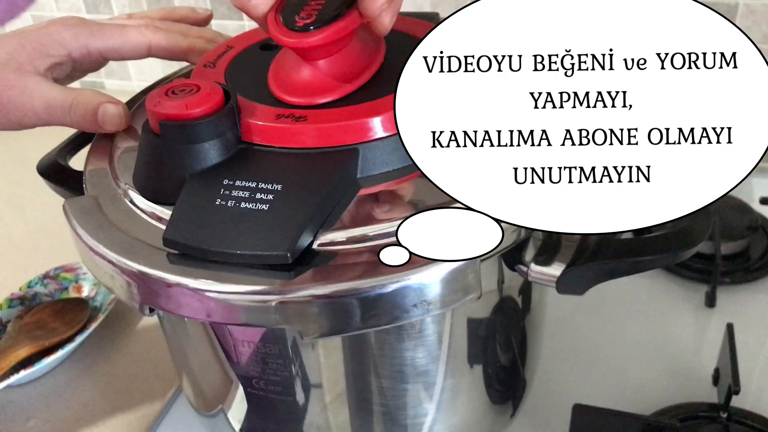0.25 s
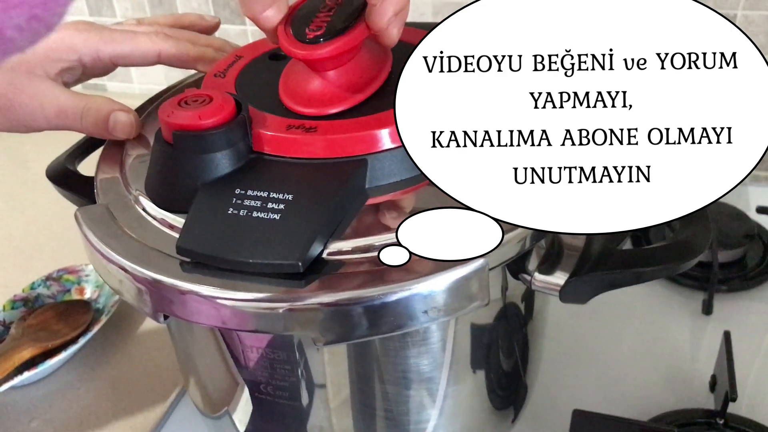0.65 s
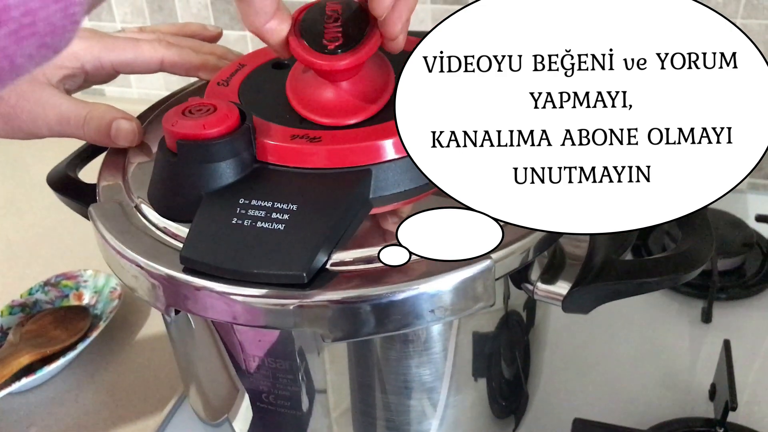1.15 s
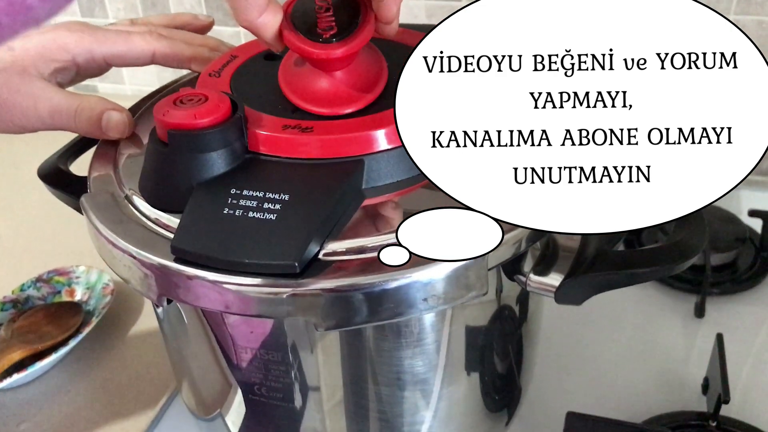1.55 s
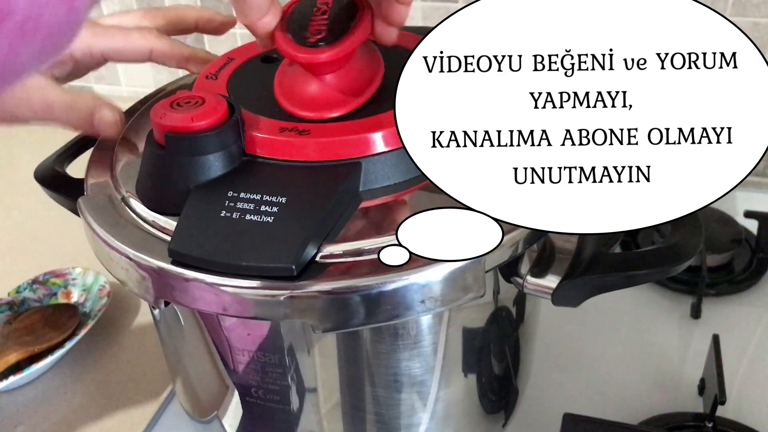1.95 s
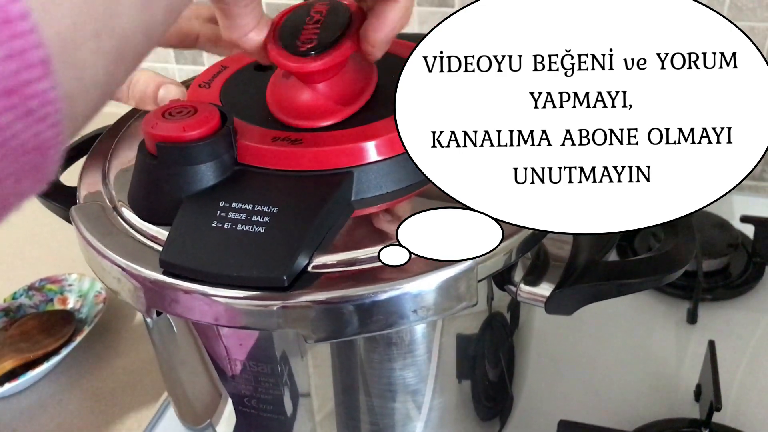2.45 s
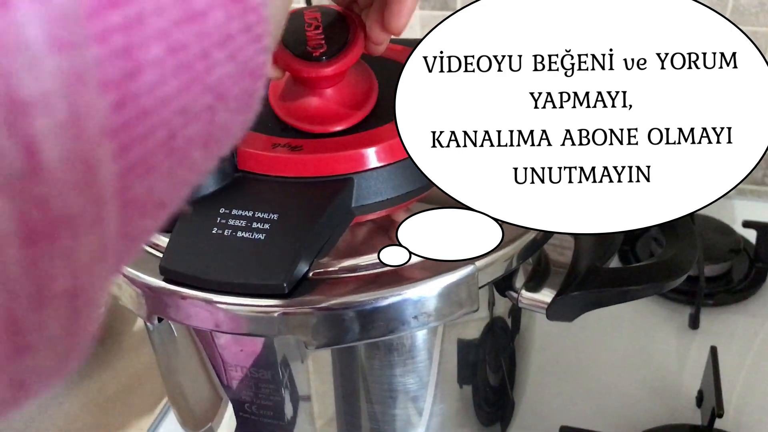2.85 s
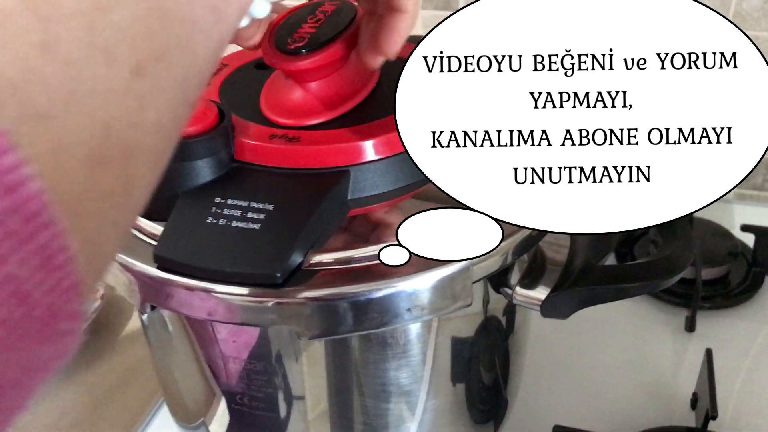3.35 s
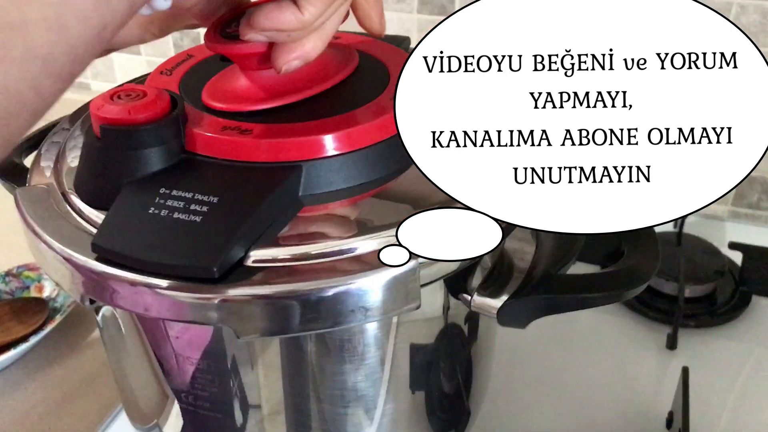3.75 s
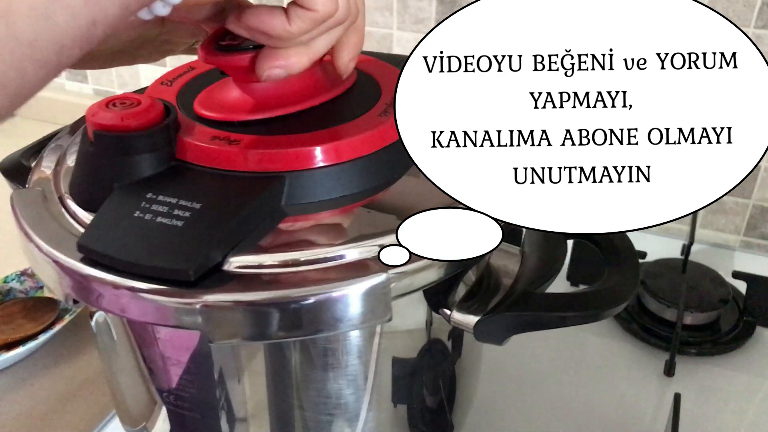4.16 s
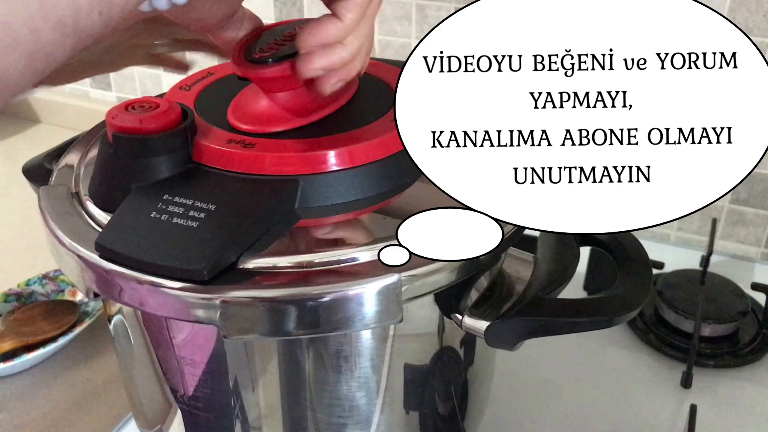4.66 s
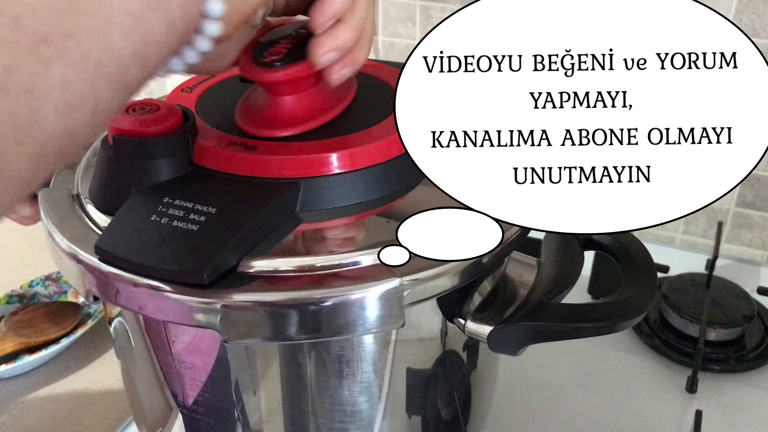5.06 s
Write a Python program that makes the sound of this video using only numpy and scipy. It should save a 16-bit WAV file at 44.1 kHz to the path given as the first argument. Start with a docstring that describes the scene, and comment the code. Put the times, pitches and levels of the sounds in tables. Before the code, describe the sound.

Close, mono sound of a hand working a plastic knob on a steel pressure cooker in a tiled kitchen. Faint steady hiss and low rumble continue throughout. Soft ticks fall between 0.1 and 0.25 s, then a quick loose plastic rattle at 0.34-0.44 s with a low pot nudge. After a pause, a tight burst of clacks at 0.85-0.9 s snaps the catch shut: by far the loudest event, hard and bright, with brief metallic lid ring, hollow pot thump and short room tail. Small clicks follow at 1.16-1.27 s. From about 2 s, quiet ticks and faint finger scuffs appear near 2.07, 2.55 and 3.1 s, with a clearer dull tick at 2.6 s. Light clicks and soft pot bumps come at 3.6-3.9 s, a small click cluster with lid shake at 4.6 s, and a final scuff and dry tick near 5.2 s.

```python
"""A hand turns the plastic knob of a steel pressure cooker in a tiled kitchen, over steady faint hiss and rumble.
First come soft ticks, then a loose rattle, and just before one second the catch snaps shut; small clicks follow.
From two seconds on, fingers scuff the knob between sparse ticks, and the last clicks come close to the end.
Each contact is a noise burst through the knob's resonances plus a snap, a ringing lid and a thump in the pot.
Swelling tones rock the pot, swelling noise shakes the lid and scuffs the knob, and shaped noise is the hiss."""
import sys
import numpy as np
from scipy import signal
from scipy.fft import rfft, irfft, next_fast_len
from scipy.io import wavfile
from scipy.ndimage import uniform_filter1d, map_coordinates

SR = 44100
rng = np.random.default_rng(int(sys.argv[2]) if len(sys.argv) > 2 else 0)


def decibels_to_gain(level_db):
    """Convert a level in decibels to a linear amplitude gain (20 dB per decade)."""
    exponent = np.asarray(level_db, float) / 20
    return 10 ** exponent


def waveform_to_disk(signal):
    """Save audio, clipped to [-1, 1], as 16-bit WAV at the path in sys.argv[1]."""
    frames = np.transpose(np.atleast_2d(signal))
    scaled = np.clip(frames, -1, 1) * 32767
    samples = np.round(scaled).astype(np.int16)
    wavfile.write(sys.argv[1], SR, samples)


N = 233834  # length [samples]

# Contacts of the catch and knob: (time [s], clack peak [dB], clack centre [Hz],
# snap re clack [dB], push on the pot re clack, before the thump gain [dB])
CONTACTS = [(0.076, -51.5, 1310, 3, -13), (.158, -40, 1260, -19, -36), (.25, -48.5, 1350, -7, -10),
            (.338, -29, 1430, -19, 4), (.343, -28.5, 1240, -10, -26), (.364, -43, 2320, 6, -1),
            (.382, -27, 1990, -1, -24), (.387, -35.5, 1600, -6, -23), (0.436, -30, 1930, -1.5, -9),
            (.85, -41, 1960, -8, -10), (.873, -35.5, 1700, 0, -18), (.881, -22, 1760, 3, -21),
            (.884, -12, 1900, -5, -14), (.888, -12, 2300, -3, -16), (.892, -7, 2700, -1, -6),
            (.895, -12, 2400, -1, -20), (.9, -12, 2280, -4, -14), (.905, -14, 2420, -5, -10),
            (1.158, -34, 1290, -4, 4.5), (1.166, -37.5, 1510, -2, -2.5), (1.224, -37, 1740, -1.5, 5),
            (1.23, -39, 1900, -9, -4.5), (1.271, -32, 2000, -21, -18), (1.556, -52.5, 1970, -14, -20),
            (2.053, -42, 2200, -25, -21), (2.057, -43, 2250, -22, -20), (2.071, -47, 2200, -21, -17),
            (2.078, -38, 1980, -6.5, -2), (2.519, -42, 3320, 3.5, -20), (2.558, -44, 2040, -17, 7),
            (2.597, -27.5, 2100, -26, -33), (2.607, -39, 1610, -25, -10), (2.875, -53, 1340, -1, -11),
            (3.122, -51.5, 2300, 7.5, 3.5), (3.521, -56.5, 1400, -11, 14), (3.61, -37, 1540, -7, -10),
            (3.721, -40.5, 2240, -2, 2.5), (3.86, -49.5, 1226, -10, 9), (4.11, -52.5, 900, -11, 2.5),
            (4.56, -38, 980, -3.5, 5.2), (4.5701, -31, 2500, -36, -22), (4.6, -34.5, 1950, 5.5, -16),
            (4.635, -36.5, 1900, 0, -1), (4.639, -41, 1500, -7, 2.5), (5.109, -48.5, 980, -26, 4),
            (5.122, -44.5, 1320, -6, 5.5), (5.185, -48, 2300, 4, -21), (5.191, -22, 2260, -25, -16),
            (5.2, -32.5, 1400, -23, -8.5)]
# Ringing modes of the steel lid: (frequency [Hz], relative level [dB], t60 [s])
LID_MODES = [(1287, -2, .3), (1394, 1, .3), (1561, -5, .25), (1809, -6, .27), (1879, -5, .3),
             (1986, -4, .21), (2213, -9, .3), (2363, -2, .26), (2546, -4, .17), (2735, -8, .24),
             (3042, -14, .3), (3397, -12, .25), (3488, -12, .3), (4102, -8, .21), (5620, -9, .23),
             (5911, -10, .22), (6126, -10, .23), (7106, -11, .27), (7251, -11, .2)]
# Resonances of the pot on the stove: (centre [Hz], width [Hz], relative level [dB])
POT_MODES = [(65, 15, -5), (92, 9, 1), (117, 16, -1), (155, 25, -5), (219, 10, 1), (278, 14, -2),
             (330, 40, -6), (362, 12, 2), (470, 50, -8), (548, 14, -1), (595, 25, -5), (680, 60, -9),
             (950, 120, -12)]
# Treble colour of a contact's snap: (frequency [Hz], relative level [dB])
SNAP_COLOUR = [(2500, -25), (4200, -3.5), (6000, -0.5), (8000, -0.5), (10500, -4.5), (12500, -0.5),
               (15500, -8.5), (17000, -75)]
# Resonances of the plastic knob: (centre [Hz], width [Hz], relative level [dB])
KNOB_MODES = [(1350, 1370, -9.5), (2030, 370, -5.5), (2300, 310, -7), (3460, 1220, -9), (4300, 1400, -10),
              (6481, 3700, -22)]
# Colour of the broad floor, rumble to hiss: (frequency [Hz], relative level [dB])
FLOOR_COLOUR = [(15, -45.5), (30, -18), (45, 12.5), (65, 8.5), (100, 6), (140, -3), (300, -6.5), (800, -11),
                (1400, -11.5), (2100, -20.5), (3500, -22), (5000, -19.5), (8000, -23), (10500, -25),
                (14500, -23.5), (15800, -22), (15900, -89.5)]
# Narrow bands of the hiss: (centre [Hz], width before squaring [Hz], level over the broad floor [dB])
HISS_BANDS = [(988, 100, 4.5), (1400, 126, 10.5), (3425, 755, 11.5), (5142, 190, 17.5), (8920, 200, 13),
              (9700, 120, 14), (11780, 780, 12.5), (12600, 200, 5), (14610, 1300, 13)]
# Tail of the tiled room: (frequency [Hz], t60 [s], relative starting level [dB])
ROOM_TAIL = [(100, 0.806, -2.5), (510, 0.4, 4.5), (2000, 0.42, -7.5), (6040, 0.28, -4), (8950, 0.1, -1),
             (14000, 0.15, 5)]
# Pushes of the hand; the pot rocks on the stove (under 160 Hz) or hums in its wall:
# (peak time [s], nominal level [dB], rise [s], fall [s], mean pitch [Hz])
PUSHES = [(.355, -50, 0.02, .1, 124.8), (.446, -48.5, 0.13, 0.21, 95), (0.904, -28, .025, 0.09, 117.7),
          (.9, -33, 0.026, 0.22, 91.9), (1.0, -44, 0.11, 0.072, 136.6), (1.235, -48, .15, 0.21, 94.4),
          (2.09, -63.5, .15, 0.22, 96), (2.52, -60, 0.057, .2, 117), (2.62, -61.5, .08, .25, 93.4),
          (3.14, -59.5, 0.062, 0.057, 109.9), (3.545, -61, 0.075, 0.14, 92), (3.73, -48.5, 0.18, .17, 115),
          (3.864, -52, .07, 0.11, 150), (3.915, -53.5, .1, 0.17, 92.7), (4.19, -57.5, 0.096, 0.17, 139.7),
          (4.61, -50.5, .1, .1, 116.4), (4.655, -48, .06, 0.077, 132.7), (4.72, -52, 0.17, 0.2, 92),
          (5.128, -55, 0.046, .05, 115), (5.216, -50.5, .05, 0.048, 143.3), (0.891, -36.5, 0.018, .08, 273),
          (2.565, -49, .02, 0.11, 362), (4.572, -51.5, .015, 0.13, 362), (0.899, -33, 0.018, 0.093, 216),
          (0.892, -32, 0.015, .06, 585), (.96, -43, 0.089, 0.15, 551), (1.04, -47.5, .08, 0.14, 266.3),
          (1.185, -47, .05, 0.12, 224.2), (1.3, -50.5, .12, 0.12, 220), (2.565, -55, 0.058, 0.053, 220),
          (3.16, -66, 0.064, .08, 217), (3.62, -62.5, 0.18, 0.25, 220), (3.735, -60, 0.14, .1, 220),
          (3.82, -44, 0.05, 0.033, 243), (3.865, -53.5, 0.046, .15, 217.4), (4.185, -52, 0.032, 0.14, 222),
          (4.33, -52.5, 0.11, 0.091, 216), (4.615, -55.5, .06, 0.14, 221), (5.216, -58.5, .08, .08, 226)]
# Shakes of the loose lid: (peak time [s], nominal level [dB], rise [s], fall [s])
SHAKES = [(.38, -48, 0.055, .06), (.51, -61, 0.044, .05), (1.244, -56, .08, 0.16),
          (2.092, -53.5, 0.11, 0.085), (2.57, -53.5, 0.042, .12), (2.62, -64.5, 0.046, 0.13),
          (2.95, -66, 0.23, .2), (3.122, -69, 0.045, 0.053), (3.53, -60, 0.036, 0.051),
          (3.736, -60, 0.2, .06), (3.85, -59, 0.064, 0.13), (4.58, -48, 0.055, 0.24),
          (5.128, -52, 0.021, 0.029), (5.216, -56, 0.058, 0.044)]
# Slides of the fingers on the knob: (peak time [s], nominal level [dB], rise [s], fall [s])
SCUFFS = [(2.066, -55, .12, .04), (2.526, -57.5, 0.053, 0.04), (2.59, -61, 0.18, .01),
          (3.098, -52.5, 0.049, .065), (3.722, -56, 0.19, 0.12), (5.18, -53.5, 0.15, 0.011)]


def contacts():
    """Each contact is a short rattle: a plastic clack, a bright snap, the lid's ring and a push on the pot."""
    ring_db, thump_db = -24, 20
    air_wet_db, pot_wet_db = -6, -5
    air, pushes = np.zeros(N), np.zeros(N)
    for s, db, hz, treble_db, push_db in CONTACTS:
        fade = rattle_fade(treble_db)
        clack = knob_clack(fade, hz, treble_db)
        snap = bright_snap(fade)
        dry_contact = clack + decibels_to_gain(treble_db) * snap + decibels_to_gain(ring_db) * lid_ring(treble_db)
        add(air, s, decibels_to_gain(db) * dry_contact)
        add(air, s, decibels_to_gain(db + air_wet_db) * kitchen(dry_contact[:SR // 10]))
        add(pushes, s, decibels_to_gain(db + push_db + thump_db) * np.hanning(12))
    pot = filtered(pushes, resonances(POT_MODES))
    return air + pot + decibels_to_gain(pot_wet_db) * kitchen(pot)[:N]


def rattle_fade(treble_db):
    """Envelope of a contact's rattle: it holds, then stops, and a duller contact stops sooner."""
    t = np.arange(SR // 3) / SR
    t60 = max(0.023 + 0.0003 * treble_db, 0.004)  # [s]
    onset = 1 - np.exp(-t / 0.0005)
    return decibels_to_gain(-60 * (t / t60) ** 1.2) * onset


def knob_clack(fade, hz, treble_db):
    """A noise burst excites the plastic knob; where it is struck picks the knob's modes."""
    sharpness = 1.27 - 0.1 * min(treble_db + 5, 0)  # Q: a duller contact has a narrower clack
    knob = resonances(KNOB_MODES)
    spot = resonances([(hz, hz / sharpness, 0)])
    clack = filtered(rng.standard_normal(len(fade)) * fade, lambda f: knob(f) * spot(f))
    return clack / abs(clack).max()


def bright_snap(fade):
    """The treble of a contact: a second noise burst, shaped and set to peak 1."""
    snap = filtered(rng.standard_normal(len(fade)) * fade, lambda f: decibels_to_gain(along(SNAP_COLOUR, f)))
    return snap / abs(snap).max()


def lid_ring(treble_db):
    """Decaying sines of the steel lid; dull blows reach only the low modes."""
    t = np.arange(SR // 3) / SR
    hz, db, t60 = np.transpose(LID_MODES)[..., None]
    strike = rng.normal(0, 3, db.shape)  # [dB], no two blows excite the same modes
    strike += treble_db * np.clip(hz / 5000, 0, 1)
    # loose parts roughen the ring: each phase wanders
    drift = np.cumsum(0.045 * rng.standard_normal((len(LID_MODES), len(t))), axis=1)
    modes = decibels_to_gain(db + strike - 60 * t / t60) * np.sin(2 * np.pi * hz * t + drift)
    return np.sum(modes, axis=0)


def pot_pushes():
    """Pushing the lid rocks the pot and hums in its wall: swelling tones with unsteady pitch and level."""
    t = np.arange(N) / SR
    waver = np.cumsum(4 * wobble(30)) / SR  # [cycles], one pitch wander of a few Hz for all tones
    tones = sum(swell(*stroke) * np.sin(2 * np.pi * (hz * t + waver)) for *stroke, hz in PUSHES)
    return tones * np.sqrt(2) * decibels_to_gain(1.6 * wobble(25))


def lid_shakes():
    """The loose lid shakes: swelling noise through the middle resonances of the pot."""
    middle = resonances(POT_MODES[5:11])
    shake = unit(filtered(rng.standard_normal(N), lambda f: middle(f) ** 2))
    return sum(swell(*stroke) for stroke in SHAKES) * shake


def finger_scuffs():
    """Skin grains on plastic excite the knob: rough noise through its resonances swells with each slide."""
    grit = decibels_to_gain(3.4 * wobble(300)) * rng.standard_normal(N)
    knob = resonances(KNOB_MODES)
    emphasis = resonances([(2250, 700, 0)])
    skin = unit(filtered(grit, lambda f: knob(f) * (0.53 + emphasis(f))))
    return sum(swell(*stroke) for stroke in SCUFFS) * skin


def swell(s, db, rise_s, fall_s):
    """Gain per sample of a stroke that climbs to its peak and sinks again, straight in dB, lightly smoothed."""
    swell_db = 25  # climbed in the rise time and lost in the fall time
    t = np.arange(N) / SR - s
    distance = np.where(t < 0, -t / abs(rise_s), t / abs(fall_s))
    return uniform_filter1d(decibels_to_gain(db - swell_db * distance), size=300)


def kitchen(x):
    """A fresh tail of the tiled room: each frequency starts at its own level and dies at its own speed."""
    hz, t, z = signal.stft(rng.standard_normal(SR // 2), SR, nperseg=256)
    f, t60, db = np.transpose(ROOM_TAIL)
    t60 = along(np.c_[f, t60], hz)[:, None]
    db = along(np.c_[f, db], hz)[:, None]
    tail = signal.istft(z * decibels_to_gain(db - 60 * t / t60), SR, nperseg=256)[1]
    delayed = np.pad(x, (250, 0))  # [samples]
    return signal.fftconvolve(delayed, tail / np.linalg.norm(tail))


def hiss():
    """A broad noise floor from rumble to hiss, with narrow bands that flutter on their own."""
    level_db = -57.5  # rms, before the slow level drift
    floor = filtered(rng.standard_normal(N), lambda f: decibels_to_gain(along(FLOOR_COLOUR, f)))
    bands = sum(decibels_to_gain(0.7 * wobble(8.5)) * hiss_band(*band) for band in HISS_BANDS)
    return decibels_to_gain(level_db + 0.25 * wobble(2.8)) * unit(floor + bands)


def hiss_band(hz, width, db):
    """One narrow band: noise in the floor's colour through a squared resonance."""
    peak = resonances([(hz, width, db / 2)])  # squaring doubles the dB
    return filtered(rng.standard_normal(N), lambda f: decibels_to_gain(along(FLOOR_COLOUR, f)) * peak(f) ** 2)


def unit(x):
    """x at rms 1."""
    return x / np.sqrt(np.mean(x ** 2) + 1e-20)


def along(points, hz):
    """Reads a (frequency [Hz], value) curve at hz, on a log frequency axis."""
    f, v = np.transpose(points)
    return np.interp(np.log(hz + 1), np.log(f + 1), v)


def wobble(rate):
    """A smooth random curve, rate knots a second."""
    knots = rng.standard_normal(int(N * rate / SR) + 4)
    return map_coordinates(knots, [np.arange(N) * rate / SR])


def filtered(x, response):
    """x times a complex response of frequency."""
    n = x.shape[-1]
    m = next_fast_len(2 * n)
    return irfft(rfft(x, m) * response(np.fft.rfftfreq(m, 1 / SR)), m)[..., :n]


def resonances(peaks):
    """Causal response of (centre [Hz], width [Hz], level [dB]) resonances, summed with alternating sign."""
    def response(f):
        total = 0
        for k, (centre, width, db) in enumerate(peaks):
            damping = 1j * f * width
            total = total + (-1) ** k * decibels_to_gain(db) * damping / (centre * centre - f * f + damping)
        return total
    return response


def add(track, s, sound):
    """Mixes a sound into a track from time s, cut at the track's end."""
    part = track[round(s * SR):][:len(sound)]
    part += sound[:len(part)]


def scene():
    """One channel: the contacts, the hand's pushes, shakes and scuffs, and the hiss."""
    hand = pot_pushes() + lid_shakes() + finger_scuffs()
    return (contacts() + hand + hiss())[None]


def roll_off(x):
    """The treble ends steeply here."""
    return signal.sosfilt(signal.butter(12, 16810, fs=SR, output="sos"), x)


def record(dry):
    """Delivers the finished mix."""
    return roll_off(dry)


dry = scene()
out = record(dry)
waveform_to_disk(out)
```